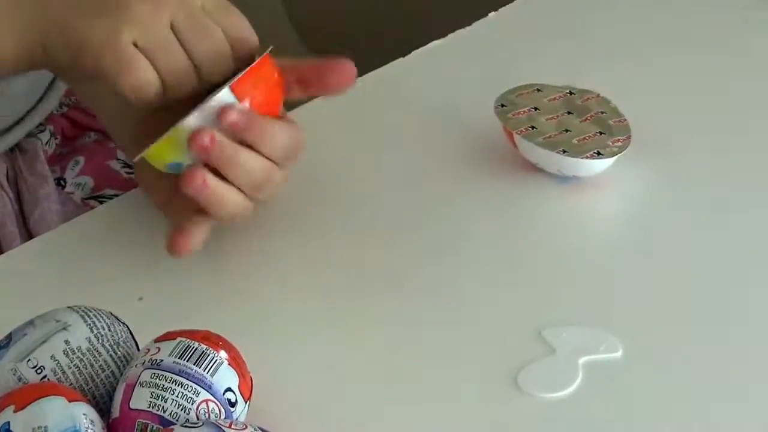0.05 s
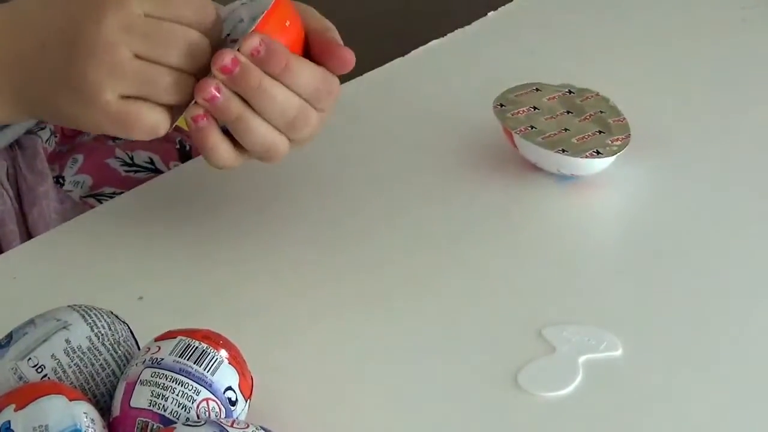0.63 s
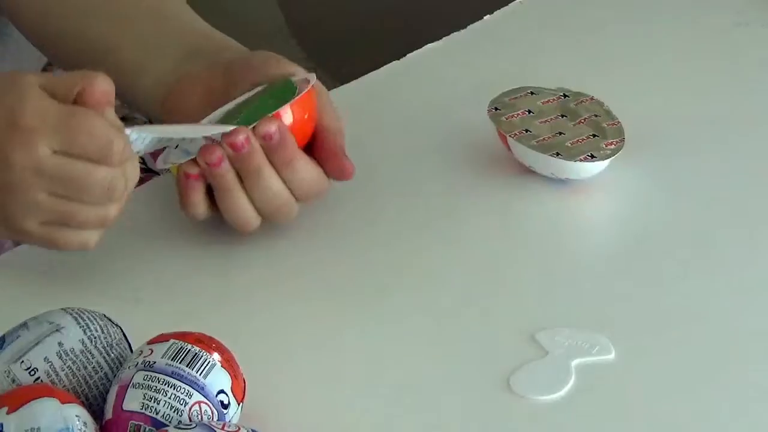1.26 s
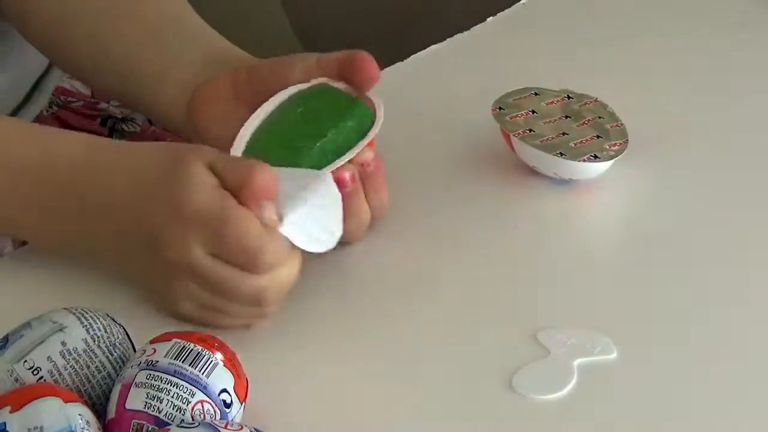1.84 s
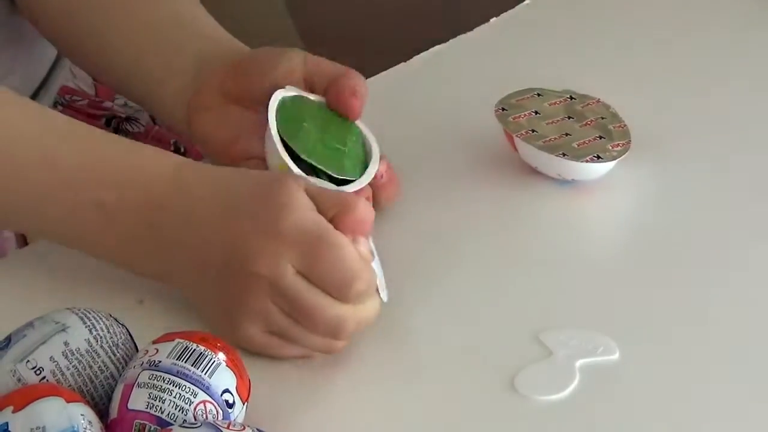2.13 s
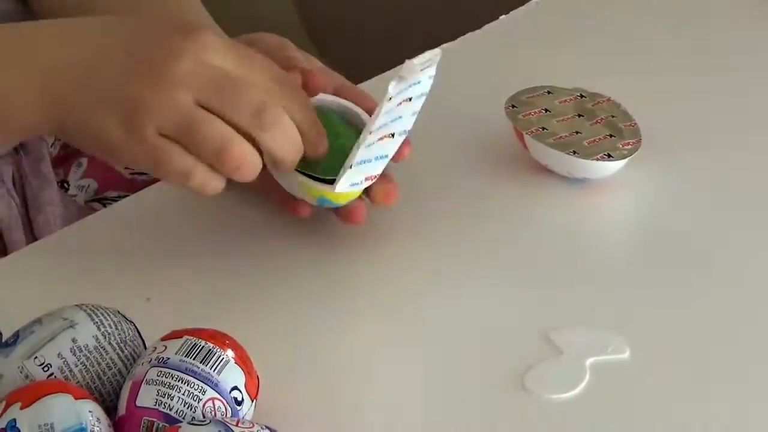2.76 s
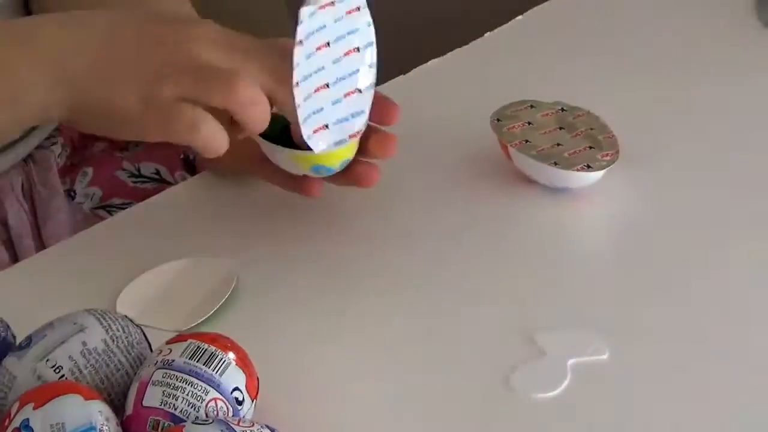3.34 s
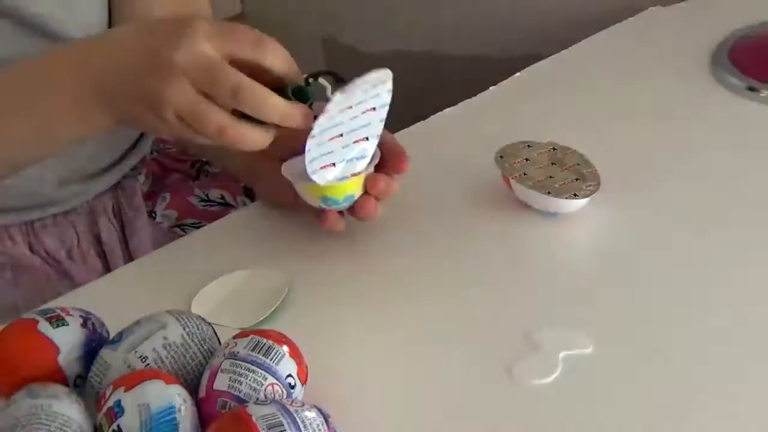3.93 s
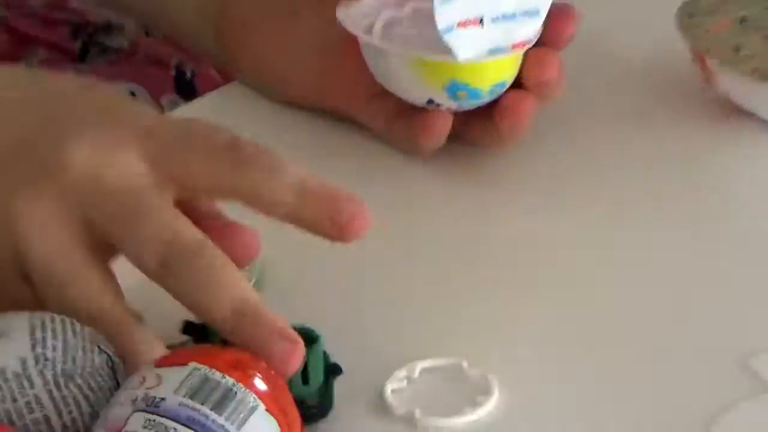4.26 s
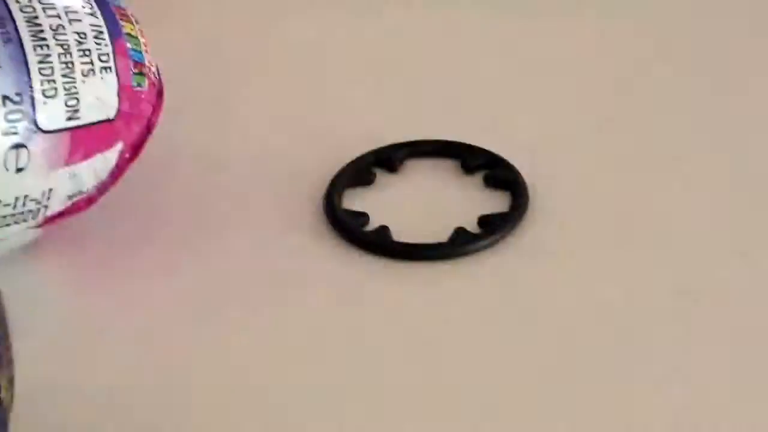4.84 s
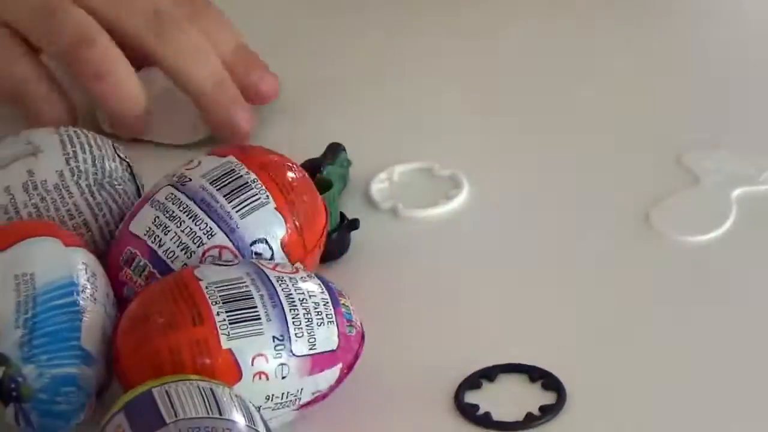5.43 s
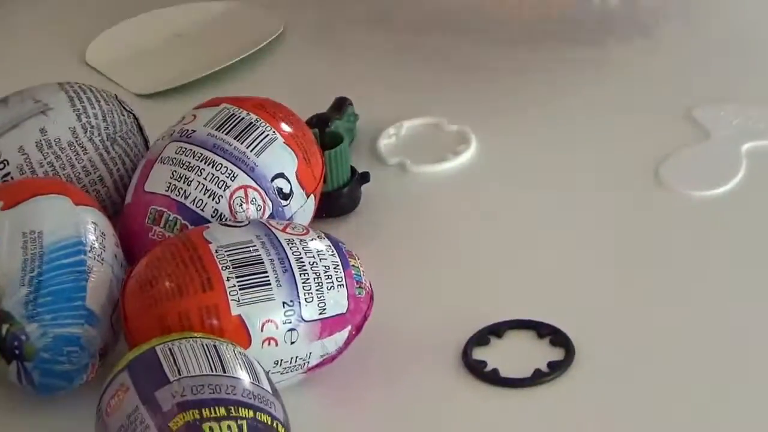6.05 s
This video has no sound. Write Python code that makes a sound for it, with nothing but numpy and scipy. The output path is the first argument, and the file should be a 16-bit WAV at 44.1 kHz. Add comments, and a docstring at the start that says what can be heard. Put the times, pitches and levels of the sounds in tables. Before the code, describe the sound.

Foil crackles and snaps on a small plastic cup, toy parts click on a table, then the lid tears in short jerks.

```python
"""A table in a small live room: a child peels the foil lid off a plastic toy egg, close to a camera. Foil
creases flip and snap; fingers rub, bump and scrape the cup. Small plastic parts knock in the cup, and a card
insert drops onto the tabletop and chatters. The last of the lid tears away in slips that ring the cup. Behind
it: one faint bird outside, the pip of the camera's electronics, room hush."""
import sys
import numpy as np
from scipy import signal
from scipy.fft import rfft, irfft, next_fast_len
from scipy.io import wavfile

SR = 44100
rng = np.random.default_rng(int(sys.argv[2]) if len(sys.argv) > 2 else 0)


def generate_wav(sig):
    """Save sig (samples, or channels by samples) to the path in sys.argv[1] as 16-bit PCM at SR."""
    pcm = np.round(np.clip(np.atleast_2d(sig).T, -1, 1) * 32767).astype(np.int16)
    wavfile.write(sys.argv[1], SR, pcm)


N = 272979
TOP_HZ = 11150  # band limit

# foil creases flipping (time [s], level [dB], treble over bass [dB], facet note [Hz], t60 [s])
FOIL_SNAPS = [(0.058, -19, -3, 2920, .019), (0.088, -27, 2, 9900, 0.053),
              (0.1366, -15.5, 5.5, 3570, 0.0354), (0.174, -17.5, 3, 1470, 0.0446),
              (0.1834, -20, -9, 3630, 0.036), (.193, -20, 14, 5900, 0.024), (0.319, -17, 14.5, 4200, 0.02),
              (.3215, -20.5, 10, 7800, 0.084), (.378, -28, -2, 4640, 0.02), (.462, -51, 9, 9600, 0.015),
              (0.648, -36, 2, 6260, 0.032), (0.6963, -19.5, 17, 9500, .021), (.707, -25.5, 2, 1600, 0.047),
              (0.7227, -21, 26, 4900, 0.015), (.761, -25.5, 4, 4000, 0.024),
              (0.8378, -28.5, 8, 5200, 0.031), (0.8727, -25, -3, 3080, 0.032),
              (0.8835, -23.5, 0, 1350, 0.073), (0.898, -29.5, 2, 1530, 0.013),
              (0.9203, -22.5, 24, 10700, 0.021), (1.0266, -30.5, 0.5, 1280, 0.039),
              (1.1061, -41, -0.5, 1450, 0.037), (1.4391, -46.5, 7, 5160, 0.063),
              (1.7514, -36.5, -1.5, 3040, 0.11), (1.7828, -32.5, 0.5, 2660, 0.025),
              (2.1233, -41.5, -12, 1710, 0.048), (2.5889, -39, -3.5, 5500, 0.039),
              (3.2204, -38, 2, 1230, 0.078), (3.2765, -44.5, 6, 1100, 0.029),
              (4.3043, -42.5, 3, 3180, 0.034), (4.356, -34, 3.5, 4630, 0.068),
              (4.4337, -34.5, -2, 3420, 0.071), (4.544, -35.5, 4.5, 10400, 0.04),
              (4.6456, -33.5, -1.5, 3270, 0.076), (4.7047, -37, -7, 1850, 0.072),
              (4.8065, -22.5, 7, 2060, 0.049), (4.824, -21, 13, 6000, 0.02),
              (4.8524, -20, 9.5, 9300, 0.032), (4.9548, -19.5, 8, 4200, 0.023),
              (4.9946, -33.5, 0, 5500, 0.028), (5.209, -18, 6.5, 3800, 0.021),
              (5.297, -28, 2.5, 7100, 0.022), (5.3068, -21, 15, 3840, 0.022), (5.3999, -18, 8, 7600, 0.024),
              (5.4324, -23.5, 7.5, 7900, 0.026), (5.4724, -24, 0, 7850, 0.027),
              (5.4955, -25, 2, 7700, 0.0091), (5.5019, -29, 5, 7400, 0.0081),
              (5.548, -30.5, -1, 9400, 0.029), (5.794, -29, 12, 3800, .023), (6.0784, -30, 5, 2060, 0.057),
              (6.135, -31, 7, 6950, 0.04)]
# snap spectrum (frequency [Hz], gain [dB])
FOIL_SPECTRUM = [(30, -17), (120, -31.5), (400, -12.5), (650, 1.5), (900, -0.5), (1500, 4.5), (2700, -0.5),
                 (4200, 2.5), (5300, 0), (6500, 3), (8300, -1), (11000, -3.5)]
# pulls on the lid (start [s], length [s], relative level of first slip [dB])
LID_PULLS = [(5.611, .1, -20.5), (5.8738, .01, -25.5), (5.892, .035, -17), (5.939, .12, -16.5),
             (5.975, .01, -19.5), (6.1746, .01, -15.5)]
# slip spectrum (frequency [Hz], gain [dB])
SEAL_SPECTRUM = [(30, -60), (200, -15.5), (400, -18), (600, -2), (1500, -4.5), (2600, -1.5), (3600, -1),
                 (4800, -10), (7000, -14), (8300, -20.5), (11000, -24)]
# crackle along the tearing seam (time [s], level [dB])
SEAM_LEVELS = [(5.4, -90), (5.5, -43), (5.62, -39.5), (5.72, -45.5), (5.8, -43), (5.88, -43), (5.95, -45.5),
               (6.08, -53), (6.15, -75)]
# seam resonances (frequency [Hz], width [Hz], gain [dB])
SEAM_MODES = [(6200, 57, -4), (6800, 330, 5), (9780, 260, 2)]
# empty cup's resonances (frequency [Hz], width [Hz], gain [dB])
CUP_MODES = [(570, 9.2, 0), (694, 4.3, 9.5), (1028, 13, 4.5), (1279, 17, 8.5), (2002, 30, 5),
             (2280, 21, 9.5), (2420, 23, -1), (2620, 9.5, 8.5), (2795, 25, 1), (3127, 60, 5),
             (3390, 8.7, 0.5), (3980, 53, -37)]
# knocks, all voiced alike: plastic parts in the cup, the card insert landing on the tabletop at 3.352 to 3.446
# s, and a few faint foil ticks at 2.792, 2.815, 3.967 and 5.1391 s (time # [s], level [dB], relative thud [dB],
# relative hollow ring [dB])
KNOCKS = [(1.879, -49.5, -21, -11), (2.2097, -53.5, -7, -19), (2.2613, -48.5, -11, -13),
          (2.306, -51.5, -24, -12), (2.3753, -43.5, -34, -3), (2.3902, -30, -59, -8),
          (2.792, -54, -14, -6), (2.815, -55, -9, -29), (3.352, -22, 1.5, -12), (3.4121, -25, 1, -4),
          (3.4185, -28, 4, -30), (3.446, -31.5, -2, -0.5), (3.5947, -17, -10.5, 7.5),
          (3.967, -47, -2, 4), (3.9994, -40, -14, -9), (5.1391, -53, -14, -2)]
# knock band centres (thud [Hz], body [Hz], click [Hz], edge [Hz])
KNOCK_BANDS_HZ = [250, 1100, 3600, 8000]
# hollow toy's resonances (frequency [Hz], width [Hz], gain [dB])
TOY_MODES = [(860, 230, 2), (2180, 47, 6), (2870, 170, -23), (3670, 640, 6.5), (4380, 350, 0),
             (5150, 190, 2), (6930, 240, 6), (8900, 380, 11.5)]
# card modes (frequency [Hz], gain [dB], t60 [s])
CARD_MODES = [(705, -5, 0.087), (1083, 11.5, 0.028), (1170, -1, 0.044), (2470, -12, 0.12)]
# tabletop under the card (frequency [Hz], gain [dB])
TABLETOP_SPECTRUM = [(30, -24), (90, -16), (180, -6), (500, -15), (3500, 3), (6000, -6), (11000, -18)]
# fingers bumping the cup (time [s], level [dB], note [Hz], t60 [s])
CUP_BUMPS = [(.058, -33, 662, 0.08), (.0885, -30.5, 657, .06), (.0994, -41, 554, 0.098),
             (.352, -38, 598, 0.2), (2.497, -51, 636, .03), (3.447, -36, 755, 0.022),
             (3.618, -48.5, 415, 0.046), (3.9115, -38.5, 424, 0.016), (5.209, -34, 682, 0.036),
             (5.2115, -32, 1033, 0.028), (5.472, -40, 612, 0.079), (5.815, -44, 259, 0.13)]
# fingertips scraping inside the cup (start [s], peak [s], end [s], peak level [dB])
CUP_SCRAPES = [(2.698, 2.753, 2.83, -47.5), (3.032, 3.18, 3.24, -51.5), (3.658, 3.832, 3.885, -40),
               (4.09, 4.135, 4.24, -50)]
# scrape spectrum (frequency [Hz], gain [dB])
RASP_SPECTRUM = [(300, -10), (1400, -8.5), (2800, -3), (3500, -4), (4400, -4), (5200, -8.5), (8000, -9),
                 (11000, -13.5)]
# hands at work (time [s], relative rub level [dB], relative crinkle level [dB])
HANDLING_LEVELS = [(0, -53, -57.5), (.55, -58, -57), (.95, -50.5, -43), (1.22, -53.5, -57.5),
                   (1.9, -61.5, -65.5), (2.15, -61.5, -60), (2.35, -54, -63), (2.92, -58.5, -55),
                   (3.28, -50, -54), (3.6, -50, -57), (3.85, -50, -52.5), (4.28, -60, -56), (4.8, -46, -41),
                   (5.12, -46.5, -51.5), (5.4, -44, -47.5), (5.55, -36.5, -46), (5.95, -35.5, -39.5),
                   (6.19, -40.5, -59)]
# skin on plastic (frequency [Hz], gain [dB])
RUB_SPECTRUM = [(30, -12), (200, 6), (400, 2), (600, 9), (1100, 4.5), (2200, 2), (3200, 1), (5000, -2),
                (11000, -44)]
# crinkling foil (frequency [Hz], gain [dB])
CRINKLE_SPECTRUM = [(200, -48), (1500, -33), (3500, -1.5), (5400, 0), (7000, 0), (8500, 0), (11000, -4)]
# bird call (time [s], pitch [Hz], level [dB])
BIRD_WHISTLE = [(1.96, 5150, -100), (2.0, 5400, -69), (2.03, 5830, -70), (2.06, 5830, -64),
                (2.1, 5550, -72), (2.13, 5400, -95)]
# room hush (frequency [Hz], gain [dB])
HUSH_SPECTRUM = [(15, -22), (30, -8), (60, -6), (115, -2), (200, -7), (400, -5.5), (650, -10.5),
                 (950, -4.5), (1500, -12), (2600, -19), (5000, -20.5), (11000, -27.5), (14000, -74)]
# room decay (frequency [Hz], t60 [s])
ROOM_T60_S = [(200, 0.28), (800, 0.2), (2100, 0.24), (5500, 0.14), (11000, 0.084)]
# diffuse sound at two microphone ports (frequency [Hz], side over mid [dB])
SIDE_SPECTRUM = [(100, -13), (600, -8.5), (1100, -10), (2000, -6.5), (4000, -18.5), (10000, -28.5)]


def foil_snaps(softness_per_s=0.76, pan_db=0.5, facet_db=7.5, facet_octaves=0.24, middle_db=2.5):
    """Creases flip one by one, each with a hollow note; slow ones swell with no sharp edge."""
    out = np.zeros((2, N))
    for time_s, db, bright_db, facet_hz, t60_s in [*FOIL_SNAPS, *seam_creases()]:
        tilt = [(1600, -bright_db / 2), (3300, middle_db), (4800, middle_db), (7500, bright_db / 2)]
        facet = lambda hz: facet_db * np.exp(-(np.log2((hz + 1) / facet_hz) / facet_octaves) ** 2)
        colour_db = lambda hz: along(FOIL_SPECTRUM, hz) + along(tilt, hz) + facet(hz)
        rise_s = softness_per_s * t60_s ** 2
        snap = crack(t60_s, spike=12 * np.exp(-(t60_s / 0.025) ** 2), gain_db=colour_db, rise_s=rise_s)
        pan = amp(pan_db * rng.standard_normal() * np.array([[1], [-1]]))
        add(out, time_s - rise_s / 2, pan * in_room(at_level(snap, db), wet_db=-5.5))
    return out


def seam_creases(count=30, per_s=28, over_seam_db=8.5, scatter_db=2, bright_db=14, hz=7600, t60_s=0.015):
    """Small creases flip at random beside the tear; rows as in FOIL_SNAPS."""
    seam_s, seam_db = np.transpose(SEAM_LEVELS)
    rows = []
    for k, (late, louder, higher) in enumerate(rng.standard_normal((count, 3))):
        time_s = seam_s[0] + (k + late / 2) / per_s
        db = np.interp(time_s, seam_s, seam_db) + over_seam_db + scatter_db * louder
        if time_s < seam_s[-1]:
            rows.append((time_s, db, bright_db, hz * 2 ** (higher / 2), t60_s))
    return rows


def lid_tear(jerk_db=-2.0, ring_db=-2.5):
    """Each slip of the seal jerks the rim and rings the cup."""
    out = np.zeros((2, N))
    for time_s, db in seal_slips():
        jerk = crack(t60_s=0.024, spike=5.5, gain_db=lambda hz: along(SEAL_SPECTRUM, hz))
        slip = at_level(jerk, db + jerk_db) + at_level(ringing(jerk, CUP_MODES), db + ring_db)
        add(out, time_s, in_room(slip, wet_db=-7.0))
    return out


def seal_slips(gap_s=0.0226, jitter_s=0.000496, grip_db=2.5, fade_db_per_s=47):
    """A pull breaks the seal's grip; long ones slip on, ever weaker. Rows (time [s], level [dB])."""
    rows = []
    for start_s, length_s, db in LID_PULLS:
        rows.append((start_s, db))
        for late_s in np.arange(gap_s, length_s, gap_s):
            rows.append((start_s + late_s + rng.normal(0, jitter_s), db - grip_db - fade_db_per_s * late_s))
    return rows


def seam_crackle(spot_gain=0.62):
    """Fine ticks of the tear: some ring the whole seam, others one spot."""
    spots = sum(unit(ringing(grains(per_s=200, spread_db=3), [mode])) for mode in SEAM_MODES)
    whole = unit(ringing(grains(per_s=140, spread_db=-11.5), SEAM_MODES))
    return amp(curves(SEAM_LEVELS)[0]) * unit(whole + spot_gain * spots)


def knocks(hard_db=-23, body_db_per_db=0.27, edge_db=-17.5):
    """Knocks, close and dry: plastic parts in the cup, and the card insert landing on the table; light touches
    are duller, hollow parts ring. A few faint foil ticks sound the same way."""
    out = np.zeros((2, N))
    for time_s, db, thud_db, ring_db in KNOCKS:
        body_db = body_db_per_db * (hard_db - db)
        bands = zip(KNOCK_BANDS_HZ, [thud_db, body_db, 0, edge_db])
        spectrum = [(30, thud_db - 13), (110, thud_db - 3), *bands]
        contact = crack(t60_s=0.023, spike=3.3, gain_db=lambda hz: along(spectrum, hz))
        knock = unit(contact) + amp(ring_db) * unit(ringing(contact, TOY_MODES))
        add(out, time_s, in_room(at_level(knock, db), wet_db=-22))
    return out


def card_drop(mode_scatter_db=8.6, thud_db=-8):
    """The insert rocks on the table: each touch rings its modes and thuds the top."""
    out, t = np.zeros((2, N)), seconds(4096)
    for time_s, db in card_touches():
        ring = sum(amp(mode_db + rng.normal(0, mode_scatter_db) - 60 * t / t60_s)
                   * np.sin(2 * np.pi * hz * t) for hz, mode_db, t60_s in CARD_MODES)
        thud = crack(t60_s=0.058, spike=4.8, gain_db=lambda hz: along(TABLETOP_SPECTRUM, hz))
        add(out, time_s, in_room(at_level(ring, db) + at_level(thud, db + thud_db), wet_db=-11.5))
    return out


def card_touches(count=5, landing_s=3.3514, landing_db=-19, flight_s=0.0093, shrink=0.9, loss_db=5.2):
    """Each bounce is shorter and weaker. Rows (time [s], level [dB])."""
    flights_s = flight_s * shrink ** np.arange(count)
    return [(landing_s + flights_s[:k].sum(), landing_db - loss_db * k) for k in range(count)]


def finger_bumps(rise_s=0.001):
    """Soft fingertips excite only the cup's lowest note; grip sets pitch and damping."""
    out, t = np.zeros((2, N)), seconds(8192)
    for time_s, db, hz, t60_s in CUP_BUMPS:
        note = np.sin(2 * np.pi * hz * t) * amp(-60 * t / t60_s) * (1 - np.exp(-t / rise_s))
        add(out, time_s, in_room(at_level(note, db), wet_db=-13.0))
    return out


def finger_scrapes(swell_db=18):
    """Skin sticks and slips on plastic: a grainy rasp that swells and stops."""
    out = np.zeros((2, N))
    friction = diffuse_noise() + 1.2 * grains(per_s=620, spread_db=2.0)
    rasp = unit(filtered(friction, lambda hz: amp(along(RASP_SPECTRUM, hz)) * (hz < TOP_HZ)))
    for start_s, peak_s, end_s, db in CUP_SCRAPES:
        pressure = np.interp(seconds(N), [start_s, peak_s, end_s], [0, 1, 0])
        out += amp(db + swell_db * (pressure - 1)) * np.minimum(10 * pressure, 1) * rasp
    return out


def handling(rub_trim_db=-7.0, crinkle_trim_db=-6.0, settle_db=-19.5):
    """Fingers rub the cup and crinkle the foil; both sounds swell as the sheet settles."""
    friction = diffuse_noise() + grains(per_s=500, spread_db=9.5)
    rub = unit(filtered(friction, lambda hz: amp(along(RUB_SPECTRUM, hz))))
    rub += 0.56 * unit(ringing(friction, CUP_MODES))
    ticks = diffuse_noise() + 0.36 * grains(per_s=220, spread_db=12.5)
    crinkle = filtered(ticks, lambda hz: amp(along(CRINKLE_SPECTRUM, hz)) * (hz < TOP_HZ))
    rub_db, crinkle_db = curves(HANDLING_LEVELS)
    stir = amp(settle_db) * foil_settling()
    rub_gain = np.hypot(amp(rub_db + rub_trim_db), stir)
    crinkle_gain = np.hypot(amp(crinkle_db + crinkle_trim_db), stir)
    return rub_gain * unit(rub) + crinkle_gain * unit(crinkle)


def foil_settling(rise_s=0.032, fade_db_per_s=234):
    """Gain of the sheet's stirring after its snaps, summed in power."""
    kicks, t = np.zeros(N), seconds(SR // 2)
    for time_s, db, *_ in FOIL_SNAPS:
        kicks[round(time_s * SR)] = amp(db) ** 2
    stir = (1 - np.exp(-t / rise_s)) * amp(-fade_db_per_s * t)
    return np.sqrt(np.abs(signal.fftconvolve(kicks, stir ** 2)[:N]))


def bird():
    """One faint arched whistle outside."""
    hz, db = curves(BIRD_WHISTLE)
    return amp(db) * np.sin(2 * np.pi * np.cumsum(hz) / SR)


def camera_pips(level_db=-72, pip_hz=2450, width_s=0.0037, frame_s=0.04):
    """The camera's electronics pip once a frame."""
    from_pip_s = (seconds(N) - 0.007) % frame_s - frame_s / 2
    envelope = np.exp(-(from_pip_s / width_s) ** 2)
    return amp(level_db) * unit(envelope * np.sin(2 * np.pi * pip_hz * from_pip_s))


def room_hush(level_db=-62):
    """Steady diffuse noise of the room."""
    return amp(level_db) * unit(filtered(diffuse_noise(), lambda hz: amp(along(HUSH_SPECTRUM, hz))))


def in_room(x, wet_db, rise_s=0.0051, size=10240):
    """A short sound plus its own stereo tail from the walls."""
    hz, t, noise = signal.stft(rng.standard_normal((2, size)), SR, nperseg=256)
    decay = amp(-60 * t / along(ROOM_T60_S, hz)[:, None])
    tail = signal.istft(noise * decay, SR, nperseg=256)[1]
    tail = diffuse(tail * (1 - np.exp(-(seconds(size) / rise_s) ** 2)))
    out = signal.fftconvolve(x[None], amp(wet_db) * tail / np.linalg.norm(tail[0]), axes=1)
    out[:, :len(x)] += x
    return out


def crack(t60_s, spike, gain_db, rise_s=1e-4, size=4096):
    """A sudden release, then a dense, fast-dying shiver."""
    t = seconds(size)
    shiver = rng.standard_normal(size) * amp(-60 * t / t60_s) * (1 - np.exp(-t / rise_s))
    shiver[0] = spike
    return coloured(shiver, lambda hz: gain_db(hz) - 60 * np.clip(hz / TOP_HZ - 1, 0, 1) ** 0.5)


def grains(per_s, spread_db):
    """Random ticks of uneven size, rms 1."""
    sizes = amp(spread_db * np.minimum(rng.exponential(size=N), 3))
    return unit((rng.random(N) < per_s / SR) * sizes * rng.choice([-1, 1], N))


def ringing(x, modes):
    """x through a body's resonances, alternating in sign."""
    def response(hz):
        return sum((-1) ** k * amp(db) * 1j * hz * width_hz / (mode_hz ** 2 - hz ** 2 + 1j * hz * width_hz)
                   for k, (mode_hz, width_hz, db) in enumerate(modes))
    return filtered(x, response)


def diffuse(pair):
    """Two unrelated signals as mid and side at two close ports."""
    side = filtered(pair[1], lambda hz: amp(along(SIDE_SPECTRUM, hz)))
    return np.array([pair[0] + side, pair[0] - side])


def diffuse_noise():
    """Stereo noise from all directions."""
    return diffuse(rng.standard_normal((2, N)))


def coloured(x, gain_db):
    """Minimum-phase filter: attacks stay sharp."""
    n = len(x)
    cepstrum = irfft(np.log(amp(gain_db(np.fft.rfftfreq(n, 1 / SR)))), n)
    cepstrum[1:n // 2] *= 2
    cepstrum[n // 2 + 1:] = 0
    return irfft(rfft(x) * np.exp(rfft(cepstrum)), n)


def filtered(x, response):
    """x through a complex frequency response."""
    n = x.shape[-1]
    padded = next_fast_len(n + SR // 10, True)
    return irfft(rfft(x, padded) * response(np.fft.rfftfreq(padded, 1 / SR)), padded)[..., :n]


def at_level(x, db):
    """x scaled to the energy of 5 ms at this level."""
    return amp(db) * x * np.sqrt(0.005 * SR / np.sum(x ** 2))


def add(track, time_s, sound):
    """Mix a sound into a track."""
    start = max(round(time_s * SR), 0)
    part = sound[..., :max(N - start, 0)]
    track[..., start:start + part.shape[-1]] += part


def along(points, hz):
    """Interpolate over log frequency."""
    points_hz, values = np.transpose(points)
    return np.interp(np.log(hz + 1), np.log(points_hz + 1), values)


def curves(rows):
    """Per-sample curve for each column after time."""
    times_s, *columns = np.transpose(rows)
    return [np.interp(seconds(N), times_s, column) for column in columns]


def seconds(size):
    """Time axis."""
    return np.arange(size) / SR


def amp(db):
    """Decibels to gain."""
    return 10 ** (np.asarray(db) / 20)


def unit(x):
    """x at rms 1."""
    return x / np.sqrt(np.mean(x ** 2) + 1e-20)


def scene():
    """All sources at the microphone."""
    lid = foil_snaps() + lid_tear() + seam_crackle()
    contents = knocks() + card_drop()
    fingers = finger_bumps() + finger_scrapes() + handling()
    return lid + contents + fingers + bird() + camera_pips() + room_hush()


def record(dry):
    """The camera's steep band limit."""
    return filtered(dry, lambda hz: 1 / np.sqrt(1 + (hz / TOP_HZ) ** 140))


dry = scene()
out = record(dry)
generate_wav(out)
```